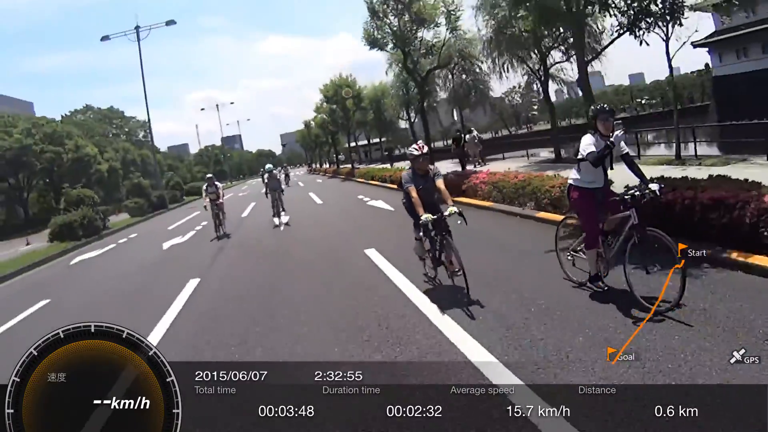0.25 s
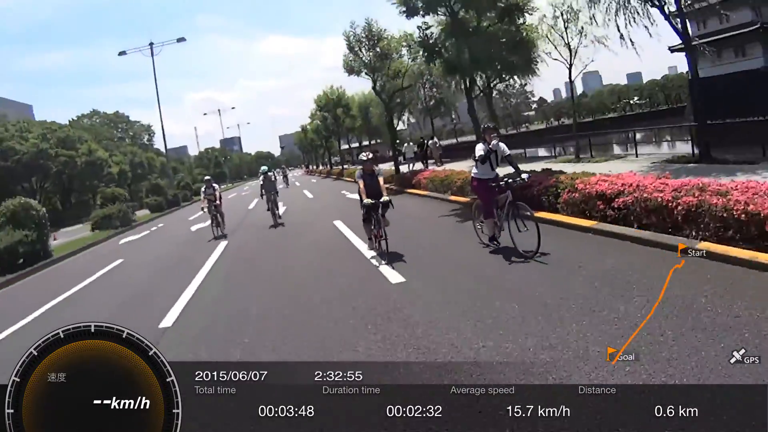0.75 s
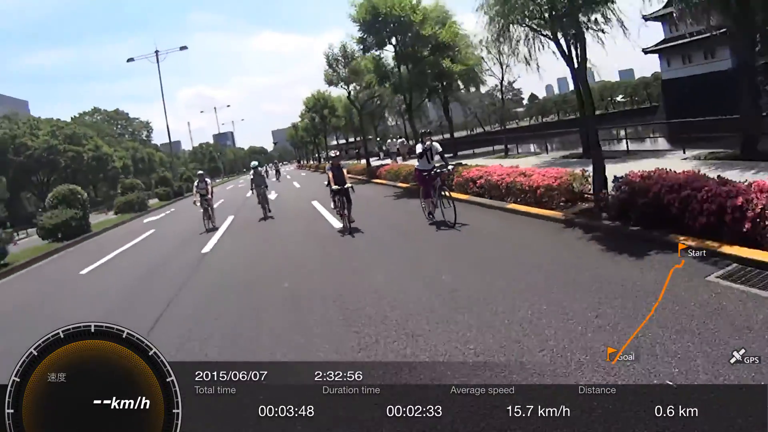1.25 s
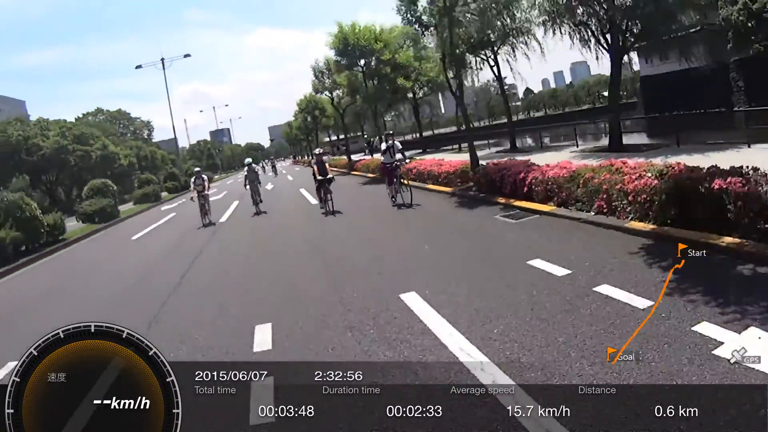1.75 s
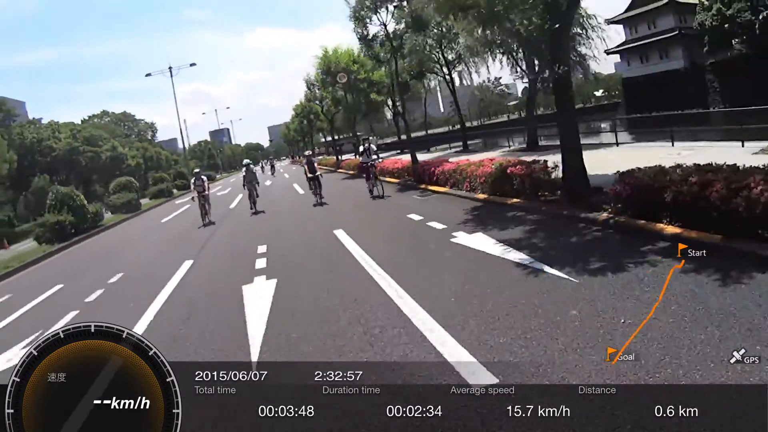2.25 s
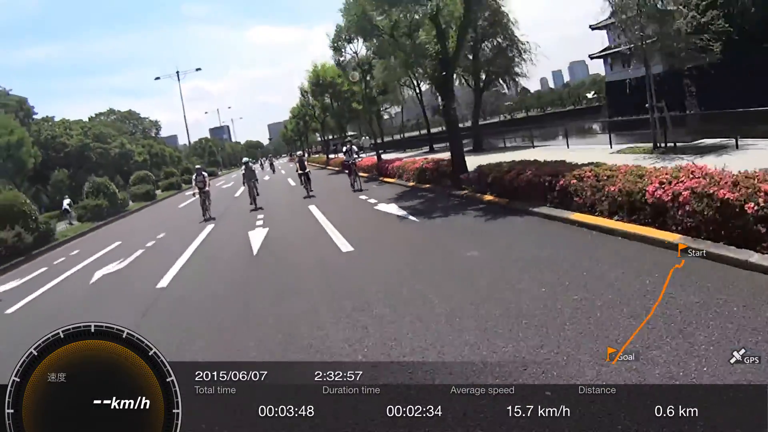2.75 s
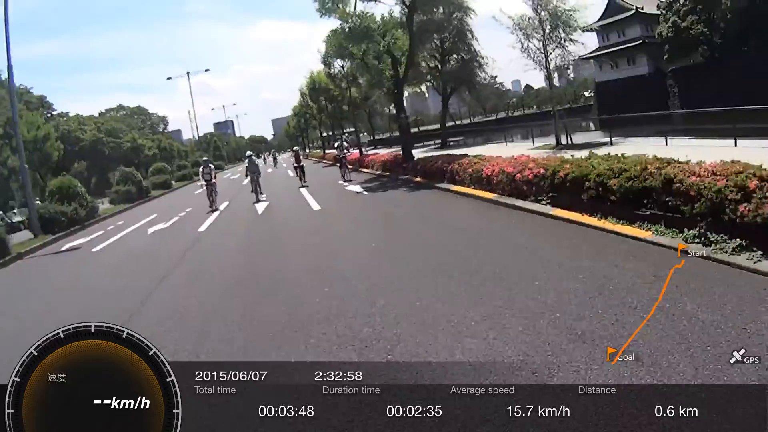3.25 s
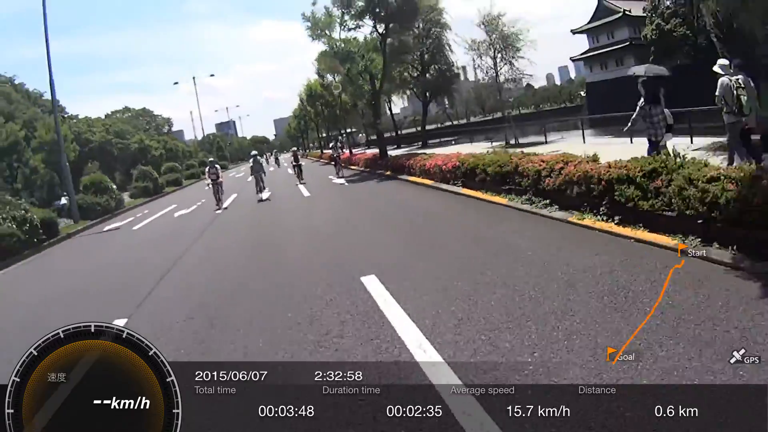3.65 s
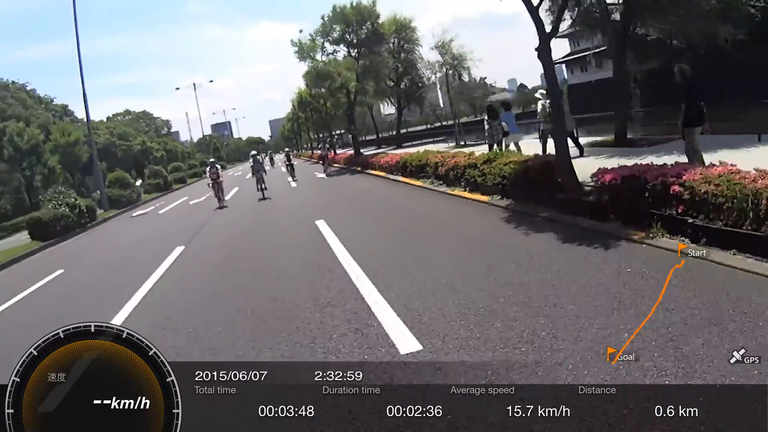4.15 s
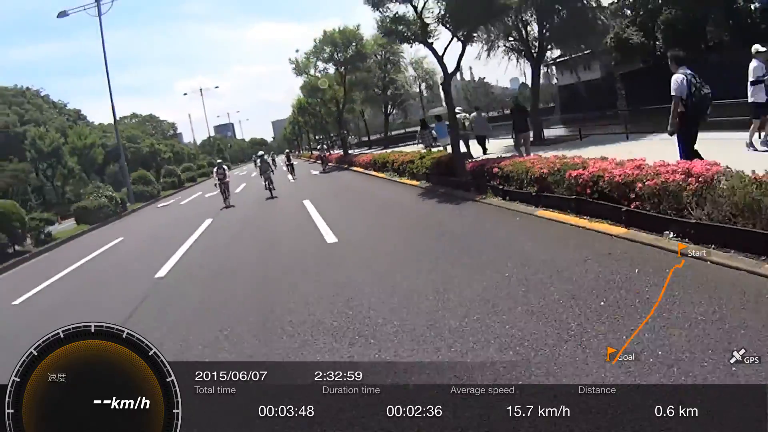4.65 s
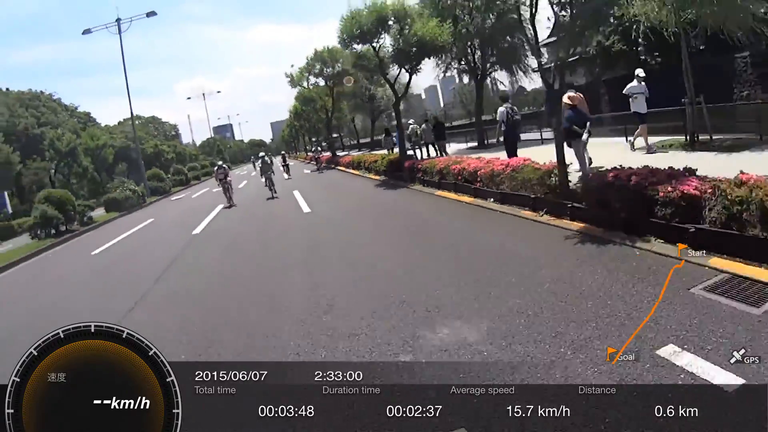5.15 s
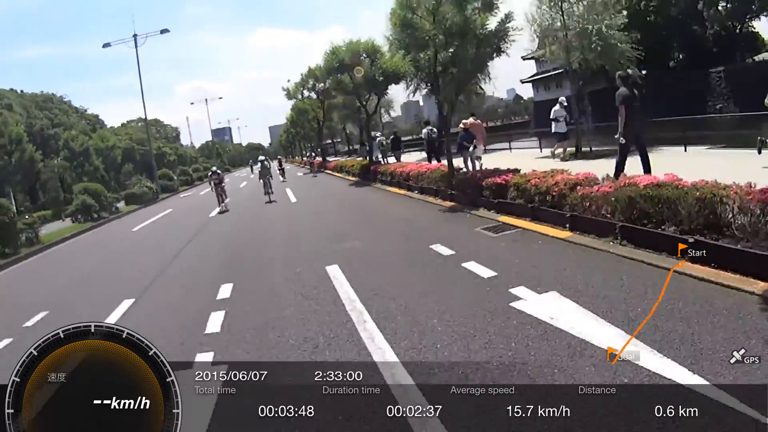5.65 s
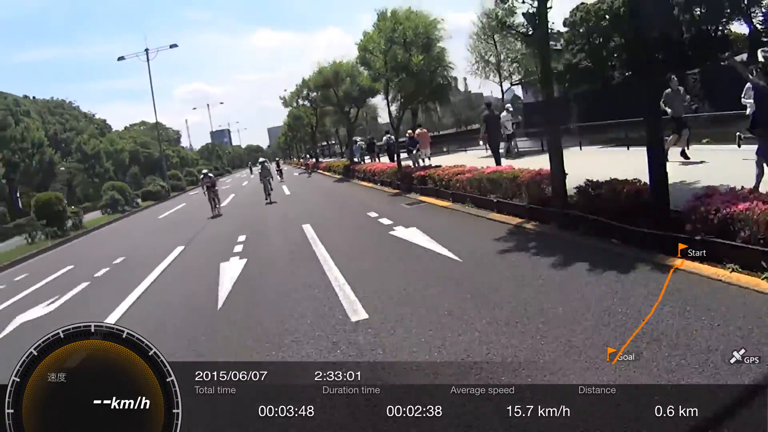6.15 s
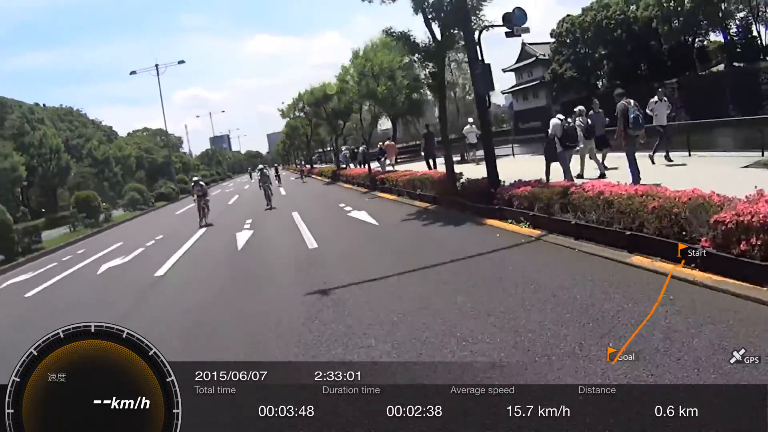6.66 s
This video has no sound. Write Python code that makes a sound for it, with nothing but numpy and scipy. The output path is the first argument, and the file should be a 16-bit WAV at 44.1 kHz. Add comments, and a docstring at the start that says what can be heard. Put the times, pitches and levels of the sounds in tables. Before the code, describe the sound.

Close, dense rattling and repeated knocks from a moving bicycle, over a steady buzz and hiss of tyres on asphalt.

```python
"""A dull jolt, then the buzz of a bicycle rolling on asphalt, with a knock at each turn of the pedals.
A loose part makes the knocks and the road's tiny stones make the buzz; both ring the frame and
a camera mount fixed to it. The shaking follows the rider's effort and swells with each downstroke.
Small parts rattle and tick, the chain whirrs and rasps, and there is one short squeak.
Behind it all, wind rumbles and the tyres hiss."""
import sys
import numpy as np
from scipy import signal
from scipy.fft import rfft, irfft
from scipy.io import wavfile

SR = 44100
rng = np.random.default_rng(int(sys.argv[2]) if len(sys.argv) > 2 else 0)


def wav_record(signal):
    """Record a signal, one row per channel, as 16-bit PCM in the file named by sys.argv[1]."""
    frames = np.transpose(np.atleast_2d(signal))
    bounded = np.clip(frames, -1, 1)
    # unit amplitude maps onto the largest positive 16-bit level
    quanta = np.round(bounded * 32767).astype(np.int16)
    wavfile.write(sys.argv[1], SR, quanta)


N = 305172


def amp(db):
    """Turns decibels into a gain."""
    return np.exp(np.asarray(db) * np.log(10) / 20)


def unit(x):
    """Scales a sound to an average strength (rms) of 1."""
    return x / np.sqrt(np.mean(x ** 2) + 1e-20)


def curve(rows):
    """Joins (time, value) points with straight lines."""
    return np.interp(np.arange(N) / SR, *np.transpose(rows))


def colour(x, points):
    """Shapes the bass and treble by (frequency, level) points."""
    hz, db = np.transpose(points)
    freqs = np.fft.rfftfreq(x.shape[-1], 1 / SR)
    gain = amp(np.interp(np.log(freqs + 1), np.log(hz), db))
    return irfft(rfft(x) * gain, x.shape[-1])


def colour_hit(x, points):
    """Like colour, but nothing sounds ahead of the hit, so it stays sharp."""
    hz, db = np.transpose(points)
    size = x.shape[-1] // 2 * 2
    freqs = abs(np.fft.fftfreq(size, 1 / SR))
    log_gain = np.log(amp(np.interp(np.log(freqs + 1), np.log(hz), db)))
    response = np.exp(signal.hilbert(log_gain).conj()[:size // 2 + 1])
    return irfft(rfft(x, size) * response, size)


def band(x, hz, kind):
    """Gently keeps the "low" or the "high" side of a frequency."""
    return signal.sosfilt(signal.butter(2, hz, kind, fs=SR, output="sos"), x)


def resonate(x, hz, width_hz):
    """Makes a sound ring around one pitch."""
    return signal.lfilter(*signal.iirpeak(hz, hz / width_hz, fs=SR), x)


def sides(db):
    """Left and right gains; positive dB leans left."""
    return amp([[db / 2], [-db / 2]])


def noise(likeness, size=N):
    """Stereo white noise; a likeness of 1 makes both sides the same."""
    white = rng.standard_normal((3, size))
    return np.sqrt(likeness) * white[0] + np.sqrt(1 - likeness) * white[1:]


def drift(hz):
    """A random wobble, mostly slower than hz."""
    return unit(band(rng.standard_normal(N), hz, "low"))


def taps(per_s, spread_db):
    """Random taps of uneven strength."""
    size, chance, sign = rng.exponential(1, N), rng.random(N), rng.choice([-1, 1], N)
    return sign * amp(spread_db * np.minimum(size, 4)) * (chance < per_s / SR)


def swell(s, half_s):
    """A bell-shaped rise and fall around time s."""
    out = np.zeros(N)
    at = np.arange(max(int((s - 4 * half_s) * SR), 0), min(int((s + 4 * half_s) * SR), N))
    out[at] = np.exp(-((at / SR - s) / half_s) ** 2)
    return out


def add(mix, s, sound):
    """Mixes a sound in at time s."""
    part = mix[:, max(round(s * SR), 0):][:, :sound.shape[-1]]
    part += sound[..., :part.shape[-1]]


# The pedals go round about 105 times a minute: (time [s], position [turns])
PEDAL_TURNS = [(0, -.36), (.8, 1), (3.08, 5), (3.63, 6), (6.92, 11.6)]
# How hard the rider pedals, easing off midway: (time [s], effort [dB])
EFFORT = [(0, 1), (1.3, 0), (1.7, -0.5), (2.5, 0.5), (3.65, 0), (3.9, -4), (4.7, -5), (5.15, -4.5),
          (5.55, -1.5), (6.45, 0.5), (6.9, 2)]
# Rough (+) and smooth (-) bits of road: (time [s], extra shaking [dB], half length [s])
ROAD_PATCHES = [(0, 0.5, 0.011), (0.127, 1, 0.017), (0.26, -3.5, 0.02), (0.383, -5.5, 0.018),
                (0.53, -1, 0.011), (0.713, 2.5, 0.026), (0.756, -2, 0.012), (0.986, -2.5, 0.02),
                (1.285, 2.5, 0.05), (1.517, -4, 0.037), (1.756, -2.5, 0.033), (1.812, 2.5, 0.015),
                (2.055, -1.5, 0.019), (2.15, -3, 0.02), (2.354, 0.5, 0.078), (2.6, 1, 0.023),
                (2.726, -2, 0.037), (2.801, 2, 0.02), (2.833, -5, 0.0092), (2.981, 3.5, 0.015),
                (3.064, 2, 0.016), (3.248, -1.5, 0.02), (3.32, 3, 0.045), (3.583, -3, 0.019),
                (4.404, 4.5, 0.023), (5.256, 4, 0.015), (5.484, 3, 0.025), (5.617, 4, 0.036),
                (5.91, 2.5, 0.035), (6.095, 3, 0.028), (6.147, -2.5, 0.014), (6.273, 0, 0.016),
                (6.392, -2, 0.072), (6.516, -5, 0.0084), (6.61, -2.5, 0.029), (6.73, -1, 0.013),
                (6.835, 1.5, 0.0098), (6.866, 1.5, 0.01)]


def shaking(stroke_db, strong_leg_db, lead_turns):
    """Shaking in dB from effort, road and two downstrokes a turn; one leg can push harder."""
    angle = 2 * np.pi * (curve(PEDAL_TURNS) + lead_turns)
    strokes = stroke_db * np.cos(2 * angle) + strong_leg_db * np.cos(angle)
    road = sum(db * swell(s, half_s) for s, db, half_s in ROAD_PATCHES)
    return curve(EFFORT) + strokes + road


# Tone of the wind and wheels: (frequency [Hz], relative level [dB])
WIND_TONE = [(12, -25), (25, -10), (42, -5), (80, -7), (130, -12), (200, -18.5), (400, -16), (1500, -43)]


def wind(level_db=-43, gust_db=1.5, stroke_db=2, lead_turns=0.0037):
    """Rushing air rumbles and throbs with each downstroke, less as the rider eases off."""
    air = unit(colour(noise(0.85), WIND_TONE))
    throb = amp(curve(EFFORT)) * np.cos(4 * np.pi * (curve(PEDAL_TURNS) + lead_turns))
    return amp(level_db + stroke_db * throb + gust_db * drift(7.8)) * air


# Tone of the tyre and air hiss: (frequency [Hz], relative level [dB])
HISS_TONE = [(120, -40), (260, 11), (430, -10.5), (720, -1.5), (1000, 2.5), (1300, -10), (2400, -34.5),
             (3000, -13.5), (4400, -11), (5200, -7), (5900, -14), (7000, -19), (11000, -32)]


def tyre_hiss(level_db=-45, follow=0.85, flutter_db=1.84):
    """Tyres and air hiss with a light flutter, louder as the bicycle shakes."""
    shake_db = shaking(stroke_db=-1, strong_leg_db=0.5, lead_turns=0.021)
    gain = amp(level_db + follow * shake_db + flutter_db * drift(19))
    return gain * sides(-1.5) * unit(colour(noise(0.55), HISS_TONE))


# Bands of faint, high fizz: (pitch [Hz], width [Hz], relative level [dB])
FIZZ_BANDS = [(5040, 450, -18), (8100, 290, 0.5), (9960, 300, 2.5)]


def fizz(level_db=-66, flicker_db=2, follow=0.2):
    """A fine, high fizz whose bands each flicker on their own."""
    out = 0
    for hz, width_hz, db in FIZZ_BANDS:
        ring = unit(resonate(noise(0.11), hz, width_hz))
        out += amp(db + flicker_db * drift(29)) * ring
    return amp(level_db + follow * curve(EFFORT)) * unit(out)


# Brief sizzles: (time [s], level [dB], time to fade by 60 dB [s])
SIZZLES = [(1.668, -35, 0.022), (3.838, -35, 0.021), (5.529, -37, 0.022), (6.787, -33.5, 0.14)]


def sizzles(low_hz=5500):
    """Short sprays of high noise."""
    out, t = np.zeros((2, N)), np.arange(SR // 5) / SR
    for s, db, fade_s in SIZZLES:
        spray = band(noise(0.16, len(t)), low_hz, "high")
        add(out, s, amp(db - 60 * t / fade_s) * spray)
    return out


# Loudness of the chain: (time [s], relative level [dB])
CHAIN_LEVEL = [(0, -36.5), (1.5, -34), (5.5, -34.5), (6.92, -36)]


def chain_whirr(level_db=-6.5, links_hz=72, throb=0.057):
    """Links run onto the teeth and keep one broad ring going."""
    links = np.cumsum(links_hz * (1 + 0.09 * drift(4.7))) / SR
    rub = noise(0.89) * (1 + throb * np.cos(2 * np.pi * links))
    whirr = resonate(rub, hz=2120, width_hz=340)
    whirr = band(band(whirr, 610, "high"), 2900, "low")
    return amp(curve(CHAIN_LEVEL) + level_db) * sides(-3.5) * unit(whirr)


# Notes of a thin metal plate: (pitch [Hz], width [Hz], relative level [dB])
PLATE_NOTES = [(2750, 140, 7), (2860, 310, -13), (3220, 110, 6)]
# When the chain touches it: (time [s], level [dB], half length [s])
CHAIN_TOUCHES = [(0.14, -35, 0.02), (0.49, -39.5, 0.023), (0.716, -36.5, 0.02), (1.088, -36, 0.018),
                 (1.296, -42, 0.017), (1.988, -44, 0.019), (2.233, -39, 0.0092), (2.495, -36, 0.018),
                 (2.807, -40, 0.028), (3.064, -40, 0.021), (3.968, -41, 0.015), (5.085, -38.5, 0.0094),
                 (5.643, -45, 0.012), (5.924, -43, 0.022), (6.278, -45, 0.014), (6.405, -37, 0.0065),
                 (6.88, -44, 0.014)]


def chain_rasps():
    """The chain brushes the plate, and a gritty run of taps makes it ring."""
    brush = unit(taps(per_s=290, spread_db=0.5)) + 0.092 * noise(0)
    ring = sum(amp(db) * unit(resonate(brush, hz, width_hz)) for hz, width_hz, db in PLATE_NOTES)
    ring = band(band(ring, 2100, "high"), 4700, "low")
    contact = sum(amp(db) * swell(s, half_s) for s, db, half_s in CHAIN_TOUCHES)
    return contact * sides(-1) * unit(ring)


# Tone of rattling parts: (frequency [Hz], relative level [dB])
RATTLE_TONE = [(900, 6), (1800, 7.5), (2500, 9), (2950, 7), (3330, 5.5), (3650, 0), (4300, -4.5),
               (4700, -13), (5250, -5), (5900, -33), (7000, -43), (11000, -61)]


def rattle(level_db=-46.5, follow=2.8, clump_db=1.5, fade_s=0.0051):
    """Cables and fittings chatter in clumps as the bicycle shakes."""
    shared = taps(per_s=550, spread_db=-2.5)
    hits = np.array([shared + 0.3 * taps(per_s=1200, spread_db=0) for _ in range(2)])
    t = np.arange(SR // 50) / SR
    click = rng.standard_normal(len(t)) * amp(-60 * t / fade_s)
    chatter = signal.oaconvolve(hits, click[None], axes=1)[:, :N]
    shake_db = shaking(stroke_db=2, strong_leg_db=1, lead_turns=0.0088)
    gain = amp(level_db + follow * shake_db + clump_db * drift(2.8))
    return gain * sides(-1.6) * unit(colour(chatter, RATTLE_TONE))


def jangles(level_db=-45, per_s=55, parts=8, follow=1.05, bounce_db=-5, fade_s=0.027):
    """The chain and cable ends make little double taps, more and louder as the bicycle shakes."""
    shake_db = shaking(stroke_db=0.5, strong_leg_db=0, lead_turns=0)
    chance = per_s * amp(shake_db) / (parts * SR)
    out, t = 0, np.arange(SR // 40) / SR
    for _ in range(parts):
        hits = (rng.random(N) < chance) * rng.uniform(0.5, 1, N)
        bounce_s = 0.0037 * rng.uniform(0.504, 2)
        hits += amp(bounce_db) * np.roll(hits, round(bounce_s * SR))
        ring = noise(0.62, len(t)) * amp(-60 * t / fade_s)
        out += signal.oaconvolve(hits[None], ring, axes=1)[:, :N]
    bright = band(colour(out, RATTLE_TONE), 2740, "high")
    return amp(level_db + follow * shake_db) * unit(bright)


# Gritty rubs and shudders of the mount: (time [s], level [dB], half length [s], pitch [Hz])
SCRAPES = [(0.213, -27, 0.012, 896), (0.311, -34, 0.013, 1350), (0.587, -33.5, 0.021, 1510),
           (0.92, -35.5, 0.018, 1260), (1.189, -30, 0.017, 1550), (1.26, -36.5, 0.017, 1440),
           (1.487, -34.5, 0.023, 1350), (1.829, -34.5, 0.015, 1230), (2.223, -40, 0.016, 1090),
           (2.51, -23.5, 0.0066, 890), (2.628, -40, 0.019, 1310), (3.535, -36, 0.016, 1140),
           (3.965, -39, 0.013, 1220), (4.42, -36.5, 0.0088, 1230), (4.526, -41.5, 0.026, 1270),
           (4.791, -34, 0.016, 1310), (4.971, -34, 0.0061, 1500), (5.272, -34, 0.0086, 1320),
           (5.43, -33, 0.0083, 1160), (5.622, -29.5, 0.026, 620), (6.685, -36.5, 0.03, 1300)]


def scrapes():
    """Short rubs and shudders of the mount swell and fade, each ringing loosely around its own pitch."""
    out = 0
    grit = unit(taps(per_s=3800, spread_db=1)) + 0.82 * noise(0)
    for s, db, half_s, hz in SCRAPES:
        rub = band(resonate(grit, hz, width_hz=0.7 * hz), 2 * hz, "low")
        out += amp(db) * swell(s, half_s) * unit(rub)
    return out


# Notes of a small hard part: (pitch [Hz], relative level [dB], time to fade by 60 dB [s])
TICK_NOTES = [(2130, 0, 0.027), (2820, 5.5, 0.012), (3342, 8.5, 0.015), (4150, 1.5, 0.0095),
              (5000, 1, 0.013), (6340, -18, 0.012), (6800, -11.5, 0.015), (8700, -15, 0.0022),
              (10350, -18.5, 0.0097)]


def tick_ring(bright_db=0, detune=0.008):
    """A tapped part rings briefly and brightly; neighbouring notes swing opposite ways."""
    t, ring = np.arange(SR // 25) / SR, 0
    for k, (hz, db, fade_s) in enumerate(TICK_NOTES):
        chance_db, pitch_chance = rng.standard_normal(2)
        note_db = db + bright_db * np.log2(hz / 3000) + chance_db
        swing = np.sin(2 * np.pi * hz * (1 + detune * pitch_chance) * t)
        ring += (-1) ** k * amp(note_db - 60 * t / fade_s) * swing
    attack = 1 - np.exp(-t / 0.0001)
    return unit(ring * attack)


def clinks(level_db=-54):
    """Small parts tick faintly at random, louder as the bicycle shakes."""
    out = 0
    for pan_db in (-2.5, 1):
        hits = taps(per_s=49, spread_db=-2.5)
        out += sides(pan_db) * signal.oaconvolve(hits, tick_ring())[:N]
    shake_db = shaking(stroke_db=3, strong_leg_db=4.5, lead_turns=0.011)
    return amp(level_db + shake_db) * unit(out)


# Sharp ticks: (time [s], relative level [dB], brightness [dB per octave])
TICKS = [(1.4464, -43, 4), (1.6688, -32.5, -4), (1.9296, -42, -5), (2.428, -26.5, -5.5), (3.1948, -25, -2),
         (3.5428, -24, 2.5), (3.6846, -33.5, -22), (5.477, -38.5, 4.5), (6.061, -38, 5), (6.1052, -23.5, 0),
         (6.5375, -36, 1), (6.678, -39, 0)]


def ticks(level_db=-6):
    """A few harder taps of the small parts stand out."""
    out = np.zeros((2, N))
    for s, db, bright_db in TICKS:
        add(out, s, amp(db + level_db) * sides(-3) * tick_ring(bright_db))
    return out


# Slips within the squeak: (time [s], level [dB], left minus right [dB])
SQUEAK_SLIPS = [(3.8325, -18, 0), (3.8372, -7, -2), (3.8447, -11, 6), (3.849, -22, 0)]


def squeak(start_hz=2380, fall_hz_per_s=20000, slip_s=0.0014, rasp_db=-21.5, rasp_s=0.0075):
    """A rasping rub slips a few times, each slip a lower chirp."""
    grit = noise(0.16)
    for _ in range(2):
        grit = resonate(grit, hz=2150, width_hz=1300)
    times = [row[0] for row in SQUEAK_SLIPS]
    out = amp(rasp_db) * swell(np.mean(times) - slip_s, rasp_s) * unit(grit)
    for s, db, pan_db in SQUEAK_SLIPS:
        hz = start_hz - fall_hz_per_s * (s - times[0])
        cycles = np.cumsum(hz * (1 + 0.1 * drift(766))) / SR  # a fast wobble roughens the tone
        tone = np.sin(2 * np.pi * cycles + np.array([[1.9], [0]]))  # the left side swings ahead
        out += amp(db) * sides(pan_db) * swell(s, slip_s) * tone
    return out


# Notes of the frame and camera mount: (pitch [Hz], relative level [dB], time to fade by 60 dB [s],
# left minus right [dB], left side's head start [radians])
MOUNT_NOTES = [(170.6, -12.5, 0.05, 3, 1), (230, -25, 0.11, -3, 3.5), (314.3, -20, 0.054, 2, 5),
               (370, -20.5, 0.041, -10, 4), (404.7, -14.5, 0.032, -20, 0), (441.3, -12.5, 0.05, -10, -2.5),
               (634, -11, 0.045, 1, 0.88), (696, -27.5, 0.12, 4, -0.5), (779, -16, 0.051, 1.5, 0.27),
               (891, -20, 0.064, 5, 1), (976, -14.3, 0.04, -2, 1), (1160, -25.5, 0.08, 4.5, 1.3),
               (1406, -19, 0.021, -7, 1.3), (1551, -15, 0.024, -4.5, -1.07),
               (2060, -20.5, 0.025, -0.5, -1.25), (3300, -29, 0.016, -7, -1.8), (3910, -22, 0.0084, 0, -1)]


def mount_ring(scatter_db, detune):
    """The frame and mount ring after one blow; each blow lands a little differently."""
    t, ring = np.arange(SR // 10) / SR, 0
    for hz, db, fade_s, pan_db, lead in MOUNT_NOTES:
        pitch_chance, level_chance = rng.standard_normal(2)
        travel_s = 0.00062 * np.sqrt(400 / hz)  # low notes travel more slowly through the frame
        age = np.maximum(t - travel_s, 0)
        phase = 2 * np.pi * hz * (1 + detune * pitch_chance) * age
        swing = np.sin(phase + lead * np.array([[0.5], [-0.5]]))
        fade = amp(db + scatter_db * level_chance - 60 * age / fade_s)
        attack = 1 - np.exp(-4 * hz * age)
        ring -= sides(pan_db) * fade * swing * attack
    return ring


# Tone of the road's push on the mount: (frequency [Hz], relative level [dB])
ROAD_TONE = [(60, -22), (170, 1), (400, -6.5), (700, -3.5), (1050, 2.5), (1600, 5.5), (2100, 8), (3000, -2),
             (6000, 6)]


def road_buzz(level_db=-39, follow=2.21, uneven_db=3, mono_hz=330):
    """Stones in the asphalt tap the tyres, and the taps reach the mount by two paths."""
    out = np.zeros((2, N))
    for weight, right_sign in ((1, 1), (0.24, -1)):
        ring = mount_ring(scatter_db=-1, detune=0.0033) * [[1], [right_sign]]
        stones = taps(per_s=870, spread_db=2)
        out += weight * signal.oaconvolve(stones[None], ring, axes=1)[:, :N]
    middle = out.mean(0)
    bass_cut = [(mono_hz / 2, -10), (mono_hz, -3), (2 * mono_hz, 0)]
    out = middle + colour(out - middle, bass_cut)  # the bass is alike on both sides
    shake_db = shaking(stroke_db=0.46, strong_leg_db=0.7, lead_turns=-0.056)
    return amp(level_db + follow * shake_db + uneven_db * drift(26.3)) * unit(colour(out, ROAD_TONE))


# The opening jolt: (time [s], level [dB])
JOLT = [(.0355, -10)]


def jolt(hz=105, fade_s=0.061, ring_db=1):
    """The whole camera nods once, and the mount rings dully."""
    out = np.zeros((2, N))
    for s, db in JOLT:
        ring = band(mount_ring(scatter_db=1.5, detune=0.01), 1200, "low")
        t = np.arange(ring.shape[1]) / SR
        nod = amp(-60 * t / fade_s) * np.sin(2 * np.pi * hz * t)
        add(out, s, amp(db) * (nod + amp(ring_db) * ring))
    return out


def crack(level_db=-17, fade_s=0.0048):
    """The first contact of a knock gives a brief, bright crack."""
    t = np.arange(SR // 10) / SR
    burst = noise(0.93, len(t))
    for _ in range(2):
        burst = resonate(burst, hz=3900, width_hz=1500)
    return amp(level_db - 60 * t / fade_s) * unit(burst)


# Knocks, the heavy ones once a pedal turn:
# (time [s], force [dB], extra bass [dB], extra hollow ring [dB], extra treble [dB])
KNOCKS = [(0.2099, -0.5, 0.5, 1.0, -0.5), (0.4176, -7.0, 2, -11, -7), (0.8, -1.5, -0.5, 4.5, -0.5),
          (0.9913, -6, 1.5, 4, -3.5), (1.148, -9, 3.5, 1, -17), (1.3658, -0.5, 3, 0, 1),
          (1.564, -12, 2.5, -6, -5), (1.71, -15.5, -0.5, 6.5, -9), (1.9386, 1, -0.5, -5.5, -3),
          (2.115, -18, 1, 6.5, -5), (2.2761, -17.5, 1, 7.5, -2.0), (2.5157, -0.5, -0.5, 1, -1),
          (2.8497, -7, 1.5, 4.5, -6), (3.0824, 0.0, 0, 0, -1.5), (3.6322, 0, 2, -5, -2),
          (4.1231, -17, -1, 3, -1), (4.2798, -13, 0, 4.5, -2.5), (4.852, -17, 0, 5.5, 0),
          (5.127, -23, -6, 7, 0), (5.381, -20, 8, -2, -3), (5.9787, -1.0, -3, 2, -0.5),
          (6.1858, -4.5, 3.5, -8.5, 0), (6.5699, -1, -1, 3.0, -4), (6.771, 1.0, 2, -12, -1.0)]


def knocks(clack_db=-21, clack_fade_s=0.025, bounce_db=-21, bounce_s=0.0106):
    """A loose part strikes, rings the mount, bounces once and makes the small parts clack."""
    out = np.zeros((2, N))
    chances = rng.standard_normal(len(KNOCKS))
    for (s, force_db, bass_db, hollow_db, treble_db), chance in zip(KNOCKS, chances):
        ring = mount_ring(scatter_db=1.5, detune=0.016)
        bounce = amp(bounce_db) * mount_ring(scatter_db=11, detune=0.017)
        add(ring, bounce_s * (1 + 0.05 * chance), bounce)
        ring += crack()
        t = np.arange(ring.shape[1]) / SR
        clack = unit(colour(noise(0.38, len(t)), RATTLE_TONE))
        ring += amp(clack_db - 60 * t / clack_fade_s) * clack
        tone = [(90, bass_db + 1), (150, bass_db), (240, bass_db), (320, hollow_db), (470, hollow_db),
                (580, 0), (1150, 0.0088), (1600, treble_db), (4200, treble_db), (6500, treble_db - 6)]
        add(out, s, amp(force_db) * colour_hit(ring, tone))
    return out


def scene():
    """The rolling bicycle, with its knocks and other short sounds on top."""
    shaken = road_buzz() + rattle() + jangles() + clinks() + scrapes()
    running = tyre_hiss() + fizz() + chain_whirr() + chain_rasps() + wind()
    return shaken + running + knocks() + ticks() + squeak() + sizzles() + jolt()


def record(dry):
    """Cuts off the highest treble steeply."""
    treble_cut = signal.firwin(401, 11200, window=("kaiser", 8), fs=SR)
    return signal.oaconvolve(dry, treble_cut[None], "same")


dry = scene()
out = record(dry)
wav_record(out)
```